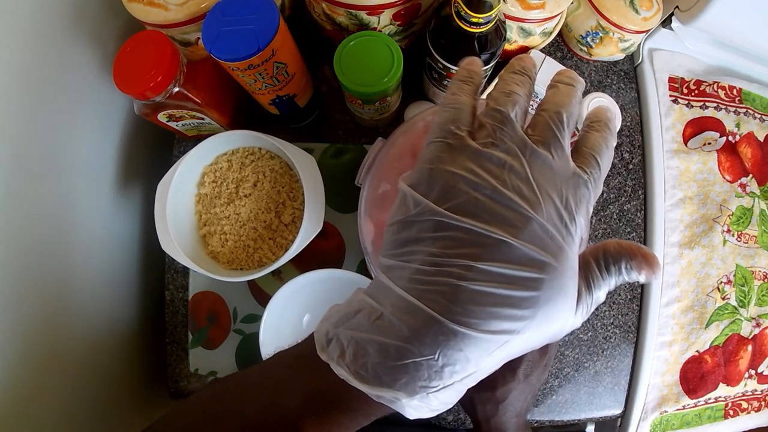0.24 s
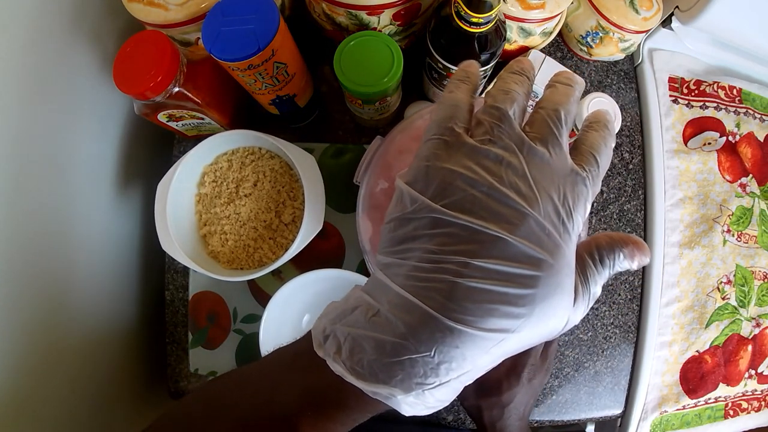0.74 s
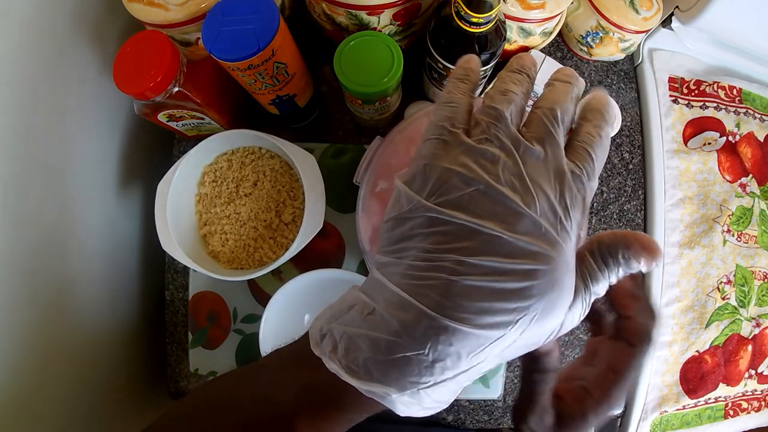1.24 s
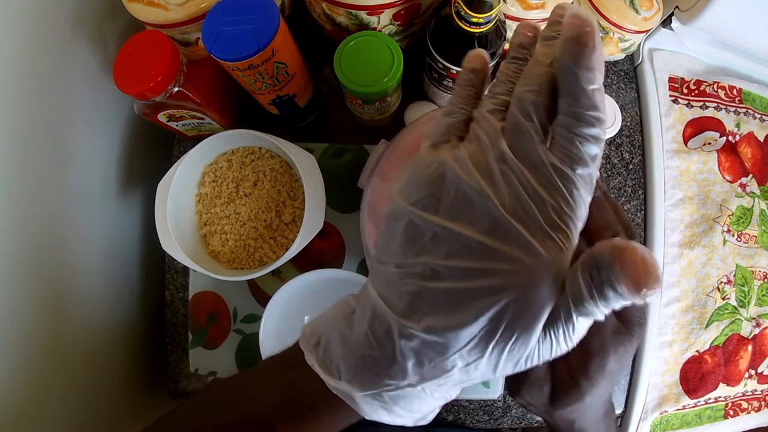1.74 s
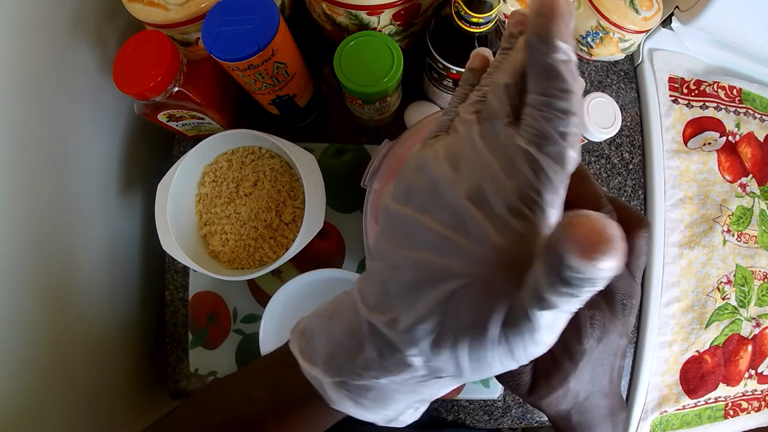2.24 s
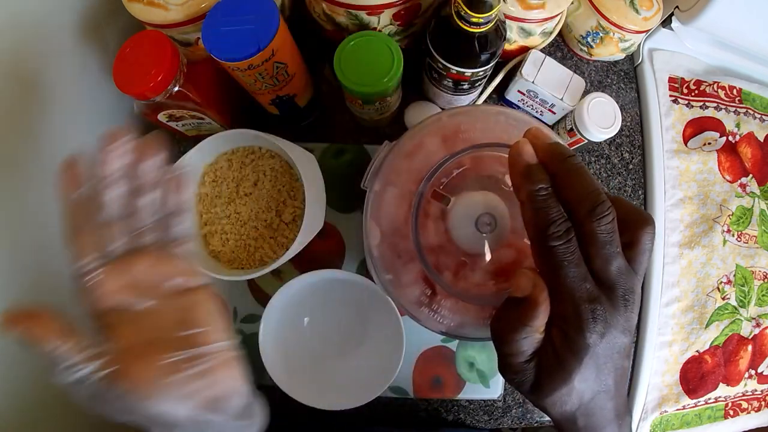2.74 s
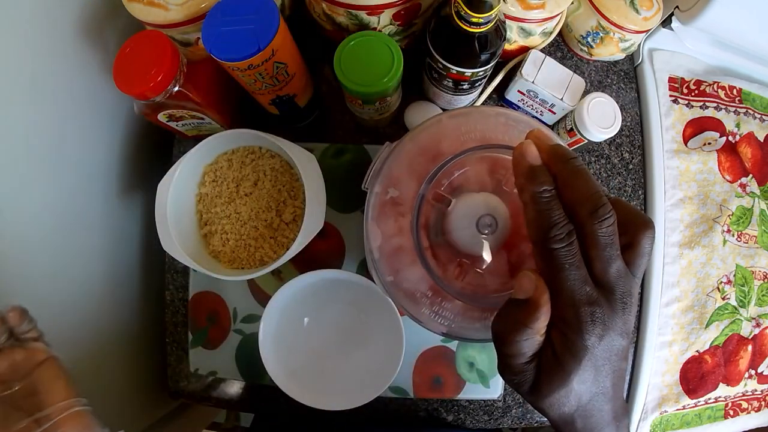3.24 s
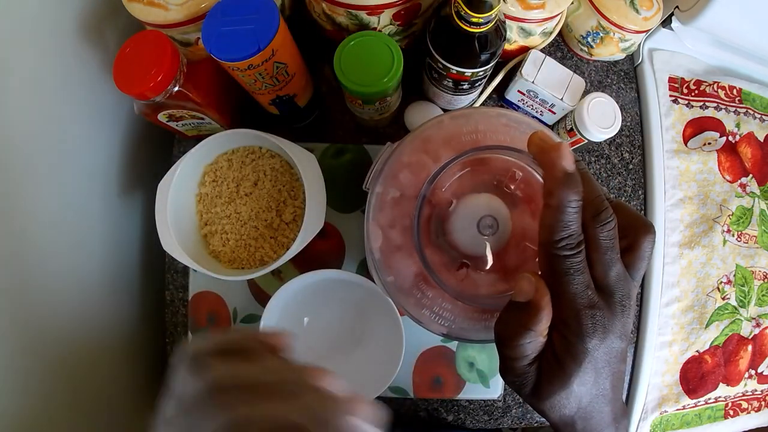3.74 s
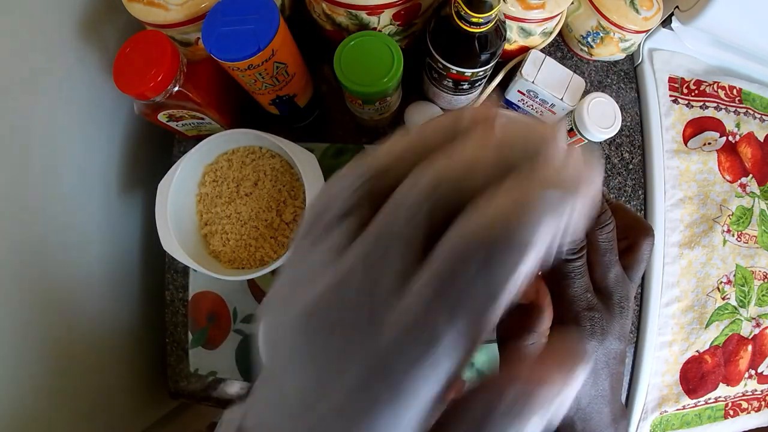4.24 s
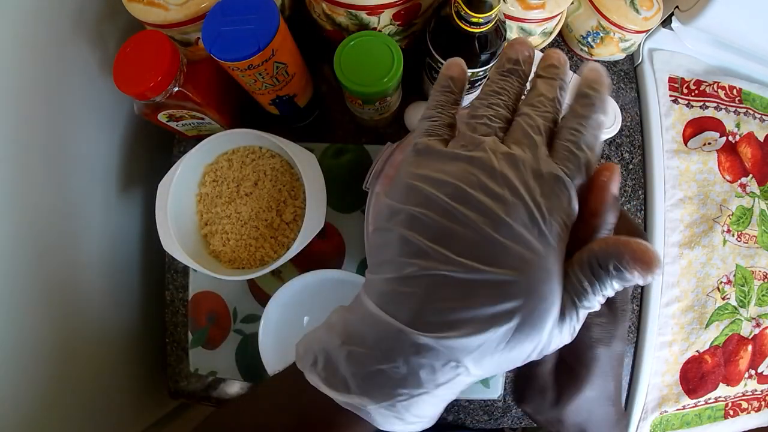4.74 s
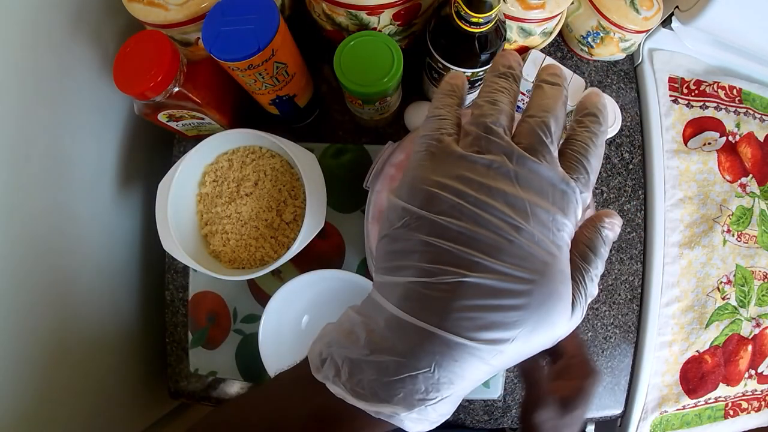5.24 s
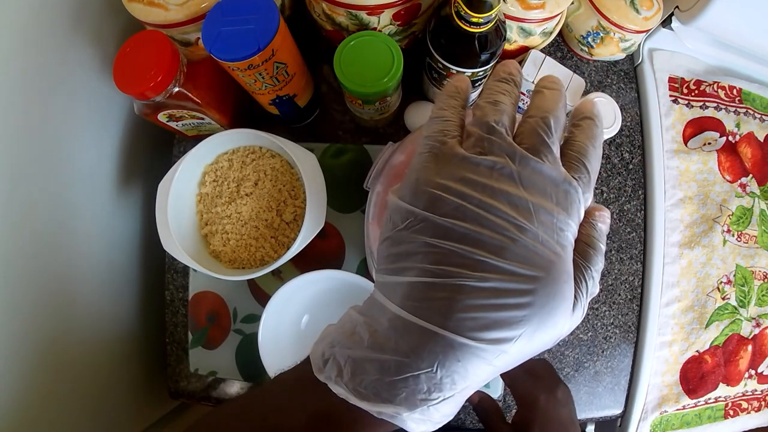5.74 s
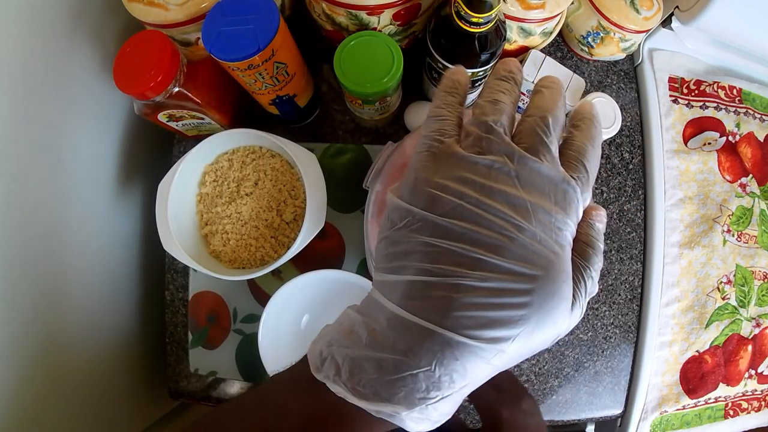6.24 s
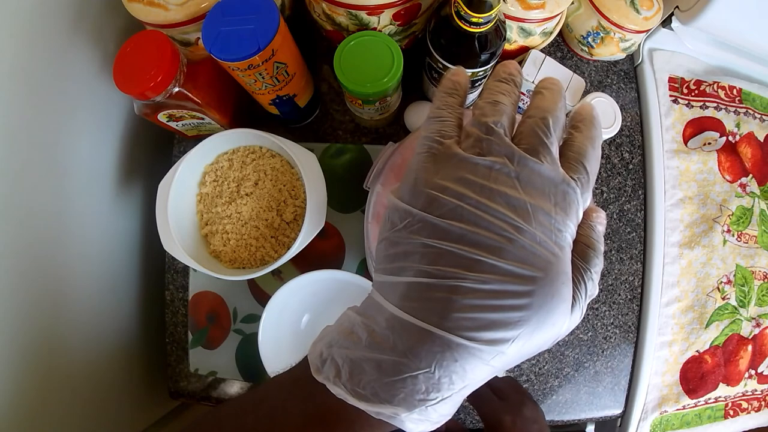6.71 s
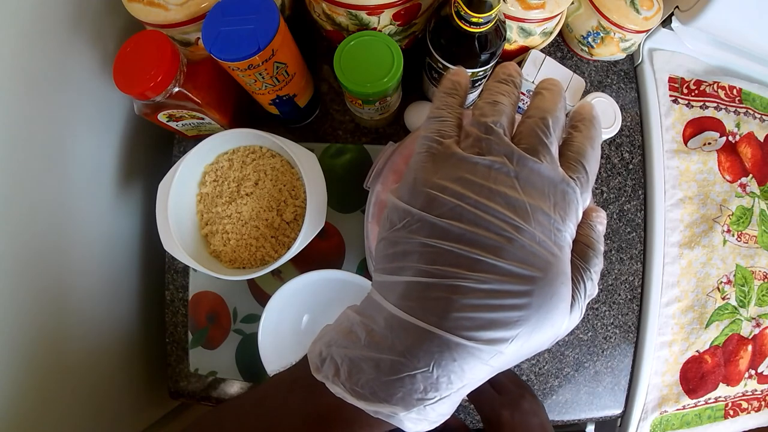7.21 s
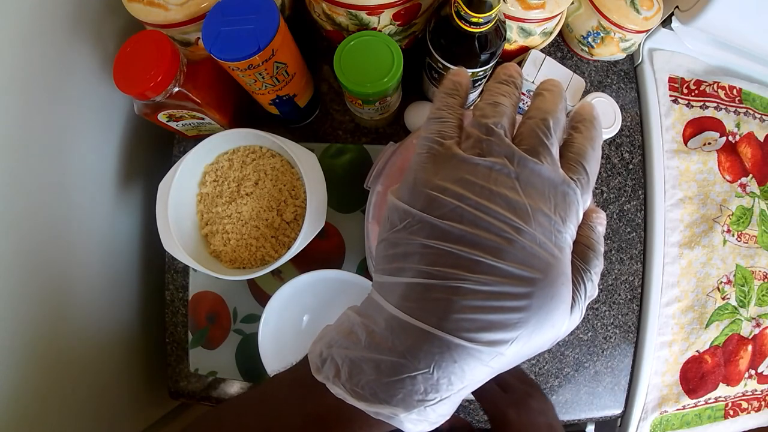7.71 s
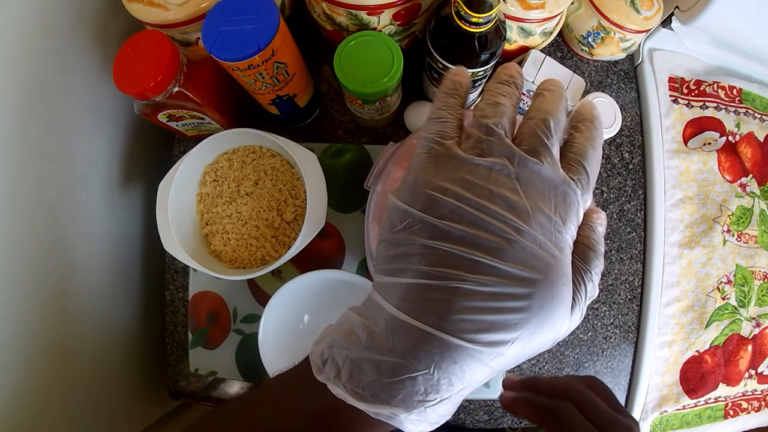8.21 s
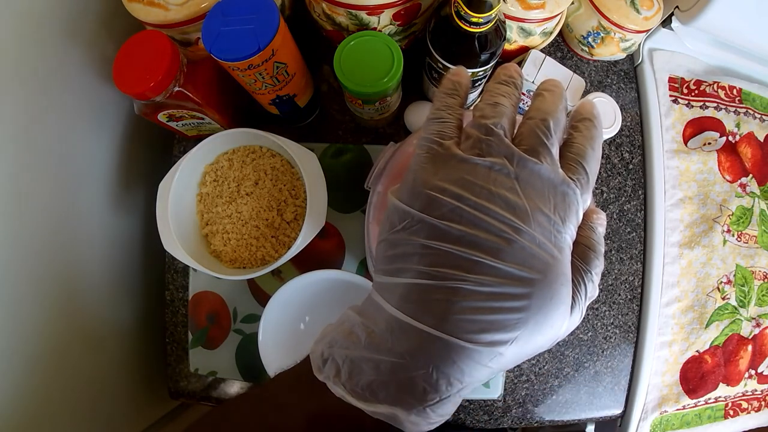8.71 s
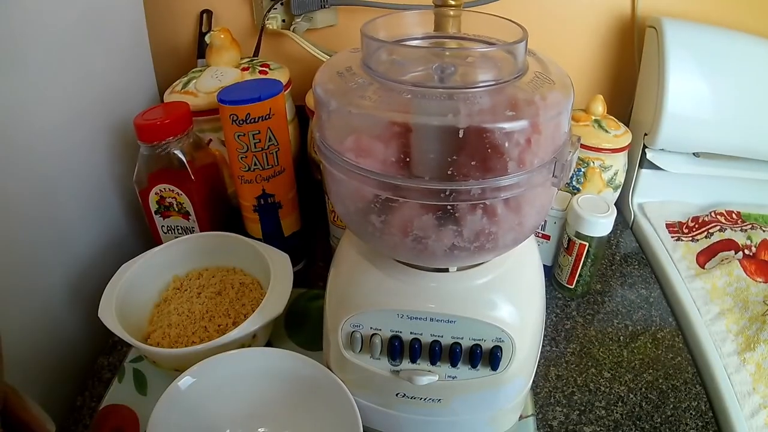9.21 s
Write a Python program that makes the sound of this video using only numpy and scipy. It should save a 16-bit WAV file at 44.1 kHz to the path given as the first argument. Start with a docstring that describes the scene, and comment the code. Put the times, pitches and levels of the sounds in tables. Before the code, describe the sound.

Close, harsh grinding of a blender mincing raw fish, with gear whine and soft thuds, laboring lower before stopping suddenly.

```python
"""A kitchen blender with a chopping bowl grinds raw fish, close by, a gloved hand on the lid. Gear and blade
contacts ring the plastic housing; air pockets plop and mince swishes against the bowl. The geared drive whines,
rasps and squeals over a low rumble, its speed sagging and recovering with load. The hand lifts for two seconds;
later the motor labours at a lower speed. The sound breaks off and quiet room noise follows."""
import sys
import numpy as np
from scipy import signal
from scipy.fft import rfft, irfft
from scipy.io import wavfile

SR = 44100
rng = np.random.default_rng(int(sys.argv[2]) if len(sys.argv) > 2 else 0)


def persist_wave(psi):
    """Save psi, clipped to +-1, as 16-bit WAV."""
    counts = np.round(np.clip(psi, -1, 1) * 32767).astype(np.int16)
    wavfile.write(sys.argv[1], SR, np.atleast_2d(counts).T)


N = 417186
TIME_S = np.arange(N) / SR
STOP_S, ROOM_FROM_S, ROOM_FADE_S = 8.823, 8.968, 0.04
ROOM_DB = -51
FREE_SHAFT_HZ, LABOUR_SHAFT_HZ = 105.3, 98.7
BLADE_RATIO, MESH_RATIO = 0.26, 15.57  # blade turns, tooth contacts per shaft turn

# shaft speed, sagging as the blades bite: time_s, speed_hz
SHAFT_SPEED = [(0.0, 108.6), (0.08, 109.0), (0.24, 105.2), (0.3, 101.9), (0.38, 102.3), (0.58, 107.8),
               (0.74, 104.7), (1.02, 102.9), (1.1, 104.8), (1.16, 103.6), (1.28, 104.9), (1.44, 102.0),
               (1.58, 106.9), (1.8, 108.2), (2.3, 101.4), (2.6, 105.7), (2.84, 101.7), (3.04, 105.1),
               (3.16, 109.2), (3.26, 108.6), (3.38, 104.8), (3.56, 104.5), (3.76, 107.5), (4.06, 105.1),
               (4.38, 108.4), (4.82, 102.7), (4.9, 104.5), (5.14, 105.1), (5.38, 98.6), (5.6, 97.0),
               (5.68, 99.1), (5.94, 96.1), (6.06, 99.8), (6.18, 96.9), (6.6, 99.5), (6.8, 98.4),
               (6.92, 95.2), (7.02, 98.4), (7.3, 100.0), (7.44, 98.3), (7.7, 97.9), (7.76, 100.0),
               (8.16, 100.6), (8.24, 98.2), (8.54, 100.9), (8.8, 99.1)]
# how far the lid is uncovered: time_s, share
LID_UNCOVERED = [(0, 0.24), (1.35, 0.37), (1.6, 0.17), (2.3, 0.38), (2.5, 0.9), (4.4, 1), (4.8, 0.63),
                 (5.3, 0.2)]
# how far the motor labours: time_s, share
MOTOR_LABOUR = [(5.1, 0.09), (5.4, 0.96)]
# gain laws: level_db, uncovered_change_db, labour_change_db, surge_db_per_hz
ROCKING_LAW = (-51.5, 13, 3, -0.5)
IMBALANCE_LAW = (-38.5, -1.5, -6.5, 1.1)
WHISTLE_LAW = (-61, 14, -20.5, 1.1)
CLATTER_LAW = (-21.5, 0.0, -0.84, 0.16)

# room noise spectrum: freq_hz, relative_db
ROOM_SPECTRUM = [(18, -41.5), (30, -10.5), (76, -15.5), (108, -3), (152, -1), (182, -9), (300, -6.5),
                 (404, -14), (443, -8.5), (532, -10), (1780, -35), (7000, -57.5), (9100, -63.5),
                 (15400, -66.5)]
# room hum: pitch_hz, level_db
ROOM_TONES = [(118.4, -58), (151.5, -57), (301.5, -64.5), (443, -61.5)]
# echoes off nearby hard surfaces: delay_s, relative_db
REFLECTIONS = [(0.00779, -13), (0.0131, -14), (0.0197, -15)]
# motor mains hum: pitch_hz, level_db
MAINS_HUM = [(60, -50), (120, -49)]
# bowl drones as the hands shift: centre_s, length_s, level_db, shaft_ratio
BOWL_DRONES = [(1.32, 0.36, -36, 1.85), (3.06, 0.14, -37, 2), (4.6, 0.26, -37, 2), (4.91, 0.16, -37.5, 1.9)]

# drive squeals: centre_s, length_s, pitch_hz, level_db
SQUEALS = [(2.43, 0.03, 3350, -45), (2.614, 0.049, 3350, -39.5), (2.765, 0.018, 3380, -42),
           (3.088, 0.018, 3370, -35), (3.128, 0.04, 3410, -37.5)]
# tooth-rubbed resonances: centre_hz, width_hz, level_db, uncovered_change_db, labour_change_db
RASP_MODES = [(286.3, 70, -49, 7.5, -3.5), (1319, 70, -52, 0, 10.5), (1669, 51, -42.5, 1.5, -7),
              (1905, 170, -52, 7.5, -6), (2938, 290, -57, -2, 10), (3333, 160, -53.5, 5.5, -14),
              (3550, 220, -64, 15, -9), (6130, 250, -67, 4.5, 11.5)]
# treble rasp of the gear mesh: time_s, level_db
MESH_RASP_LEVEL = [(0, -47.5), (0.8, -48.5), (1.5, -47.5), (1.9, -54), (2.8, -51), (3.35, -49.5),
                   (4.2, -47.5), (4.5, -50), (5.05, -47.5), (5.5, -52), (6.2, -49.5), (8.8, -51)]
# clear tone of the gear mesh: time_s, level_db
MESH_WHINE_LEVEL = [(0, -55), (0.35, -38), (0.7, -48.5), (1.3, -44.5), (1.6, -39), (2.2, -48.5),
                    (2.5, -35.5), (2.9, -38), (3.2, -33.5), (3.4, -47), (3.75, -31.5), (4.05, -41.5),
                    (4.25, -35), (4.5, -39), (4.75, -45), (5.2, -46), (5.35, -33), (5.95, -32.5),
                    (6.35, -34), (7.5, -33.5), (8.0, -38.5), (8.3, -31), (8.8, -38)]
# drive tones: shaft_ratio, level_db, uncovered_change_db, labour_change_db, noise_share
DRIVE_TONES = [(0.261, -56.5, -2, -2, .1), (1.993, -52.5, 5.5, -6.5, 0), (3.01, -46.5, -7.5, -7.5, 0.3),
               (3.75, -42.5, -2.5, 4.5, .2), (3.999, -30.0, -3.5, -1.6, .01), (4.44, -46, -3, 5.5, 0.7),
               (14.82, -46.5, -2.5, 11, 0.35), (31, -57, 6.5, 2, 0.5)]

# mince swept round the wall: centre_s, length_s, level_db
SWISHES = [(1.75, 0.2, -41.5), (2.407, 0.099, -46), (3.19, 0.078, -35.5), (3.798, 0.078, -38),
           (5.125, 0.08, -41), (7.45, 0.075, -38.5)]
# wet splat spectrum: freq_hz, relative_db
SWISH_SPECTRUM = [(300, -34), (1400, -7.5), (2100, 1), (3000, -6.5), (4200, -10.5), (6200, -20.5),
                  (7600, -45)]
# air pockets plopping in the mince: centre_s, peak_db, pitch_hz
AIR_PLOPS = [(0.077, -17, 810), (0.284, -14, 1010), (0.335, -17, 956), (0.995, -13, 900),
             (1.432, -9.5, 1010), (1.644, -13, 870), (2.3065, -13.5, 870), (2.362, -18, 410),
             (2.423, -15, 960), (2.769, -19.5, 1640), (3.219, -16, 990), (3.734, -16, 870),
             (4.603, -15, 950), (5.006, -14, 880), (5.954, -14, 400), (6.348, -20.5, 390),
             (6.657, -17, 390), (7.735, -19, 955), (7.948, -19, 1550), (8.787, -26, 950)]
# low ring of the bowl: time_s, gain_db
BOWL_RING_GAIN = [(0, -0.5), (2.2, -0.1), (2.6, 1.5), (3.15, 0), (3.4, -0.4), (4.3, -1.5), (4.9, -1),
                  (5.4, 0), (6.7, 0), (7.5, 0.3), (8.8, -0.4)]
# broad clatter spectrum: freq_hz, relative_db
CLATTER_SPECTRUM = [(25, -37.5), (85, -19.5), (125, -8.5), (240, -17), (330, -8), (520, -13.5),
                    (1000, -10.5), (1650, -12.5), (2400, -27.5), (3800, -32), (5500, -39.5), (6330, -40),
                    (6600, -48), (7700, -60), (15500, -62.5)]
# housing and bowl resonances: centre_hz, width_hz, lift_db
HOUSING_MODES = [(181, 19, 3.5), (363, 45, 7.5), (435.5, 65, 6.5), (607, 49, 7.5), (778, 31, 3.5),
                 (858.4, 102, 11.5), (843, 50, 3.5), (1010, 90, 5), (1093, 56, 7.5), (1266, 55, 3),
                 (1466, 71, 6.5), (1550, 55, 5), (2150, 140, 3.5), (2724, 60, 8), (3750, 130, 5),
                 (4740, 600, 4), (5800, 90, 4.5)]


def from_db(db):
    """Decibels to gain."""
    return 10 ** (np.asarray(db) / 20)


def unit_rms(x):
    """Scale to rms 1."""
    return x / np.sqrt(np.mean(x ** 2) + 1e-20)


def curve(rows):
    """Interpolate (time_s, value) rows at every sample."""
    return np.interp(TIME_S, *np.transpose(rows))


def swell(centre_s, length_s):
    """Rounded rise and fall, height 1."""
    return np.sqrt(np.clip(1 - (2 * (TIME_S - centre_s) / length_s) ** 2, 0, 1))


def drift(rate_hz):
    """Smooth random motion up to about rate_hz, rms 1."""
    step, run_in = 10, 8000
    lowpass = signal.butter(2, min(rate_hz, SR / step / 4), fs=SR / step, output="sos")
    slow = signal.sosfilt(lowpass, rng.standard_normal(N // step + run_in + 2))[run_in:]
    return np.interp(np.arange(N) / step, np.arange(len(slow)), unit_rms(slow))


def sine(turns):
    """Sine, rms 1."""
    return np.sqrt(2) * np.sin(2 * np.pi * turns)


def narrow_noise(turns, width_hz):
    """Noise band around a carrier, rms 1."""
    return (drift(width_hz / 2) * sine(turns) + drift(width_hz / 2) * sine(turns + 0.25)) / np.sqrt(2)


def blend(tone, noise, noise_share):
    """Equal-power mix."""
    return np.sqrt(1 - noise_share) * tone + np.sqrt(noise_share) * noise


def impacts(rate_per_s, spread_db):
    """Random impulses of uneven size and sign."""
    sizes = from_db(spread_db * np.minimum(rng.exponential(1, N), 4)) * rng.choice([-1, 1], N)
    return sizes * (rng.random(N) < rate_per_s / SR)


def coloured(x, spectrum, modes=(), taps=8192):
    """Minimum-phase filter of a broad spectrum plus resonant peaks; output rms 1."""
    hz = np.maximum(np.fft.rfftfreq(taps, 1 / SR), 1)
    points_hz, points_db = np.transpose(spectrum)
    db = np.interp(np.log(hz), np.log(points_hz), points_db)
    for centre_hz, width_hz, lift_db in modes:
        db += lift_db / (1 + (2 * (hz - centre_hz) / width_hz) ** 2)
    cepstrum = irfft(np.log(from_db(db)))
    impulse = irfft(np.exp(rfft(2 * cepstrum[:taps // 2], taps)))
    return unit_rms(signal.oaconvolve(x, impulse)[:N])


def law_gain(law, uncovered, labour, surge_hz):
    """Gain of a part from lid cover, labour and speed above the usual."""
    db, uncovered_db, labour_db, surge_db_per_hz = law
    return from_db(db + uncovered_db * uncovered + labour_db * labour + surge_db_per_hz * surge_hz)


def hum(tones):
    """Sum of steady sines."""
    return sum(from_db(db) * sine(hz * TIME_S) for hz, db in tones)


def room_noise():
    """Dull kitchen air with a faint hum."""
    return from_db(ROOM_DB) * coloured(rng.standard_normal(N), ROOM_SPECTRUM) + hum(ROOM_TONES)


def reflected(x, above_hz=1700):
    """Early reflections comb the treble without raising its level."""
    treble = signal.sosfilt(signal.butter(1, above_hz, "high", fs=SR, output="sos"), x)
    echoes = sum(from_db(db) * np.interp(TIME_S - delay_s, TIME_S, treble, left=0)
                 for delay_s, db in REFLECTIONS)
    power = 1 + sum(from_db(db) ** 2 for _, db in REFLECTIONS)
    return x - treble + (treble + echoes) / np.sqrt(power)


def rocking(centre_hz=59, width_hz=14):
    """The unbalanced load rocks the machine on its feet."""
    return narrow_noise(centre_hz * TIME_S, width_hz)


def imbalance(turns, waver_db=1.5):
    """The unbalanced shaft hums at one cycle per turn."""
    return from_db(waver_db * drift(6)) * sine(turns)


def bowl_drones(turns, noise_share=0.39):
    """Pressed askew, the bowl drones near twice shaft speed."""
    shudder = narrow_noise(2 * turns, width_hz=24)
    out = np.zeros(N)
    for centre_s, length_s, db, ratio in BOWL_DRONES:
        tone = sine(ratio * turns + rng.random())
        out += from_db(db) * swell(centre_s, length_s) * blend(tone, shudder, noise_share)
    return out


def whistle_and_squeals(whistle_gain, surge_hz, whistle_hz=3350, wander_hz=24, flutter_db=1.5):
    """The drive whistles at a resonance; at times it sticks and squeals with a chatter."""
    wander_turns = np.cumsum(wander_hz * drift(110)) / SR
    whistle_turns = np.cumsum(whistle_hz + 4 * surge_hz) / SR
    out = whistle_gain * from_db(flutter_db * drift(35)) * sine(whistle_turns + wander_turns)
    chatter = 1 + 0.45 * narrow_noise(70 * TIME_S, width_hz=40)
    for centre_s, length_s, hz, db in SQUEALS:
        out += from_db(db) * swell(centre_s, length_s) * chatter * sine(hz * TIME_S + wander_turns)
    return out


def tooth_rasp(uncovered, labour, flutter_db=2.5):
    """Rubbing teeth fitfully excite narrow resonances; the hand damps some."""
    out = np.zeros(N)
    for hz, width_hz, db, uncovered_db, labour_db in RASP_MODES:
        level_db = db + uncovered_db * uncovered + labour_db * labour + flutter_db * drift(21)
        out += from_db(level_db) * narrow_noise(hz * TIME_S, width_hz)
    return out


def mesh_rasp(turns, labour, sideband_ratio=0.78, ring_hz=4920, flutter_db=1.84):
    """The third mesh harmonic and its sidebands ring the housing; the ring fades under labour."""
    ratios = 3 * MESH_RATIO + sideband_ratio * np.arange(-2, 3)
    cluster = unit_rms(sum(narrow_noise(ratio * turns, width_hz=36) for ratio in ratios))
    ring = narrow_noise(ring_hz * TIME_S, width_hz=110)
    gain = from_db(curve(MESH_RASP_LEVEL) + flutter_db * drift(25))
    return gain * blend(cluster, ring, 0.38 * (1 - labour))


def mesh_whine(turns, waver_db=0.9):
    """One clear gear tone, swelling as the teeth press together."""
    return from_db(curve(MESH_WHINE_LEVEL) + waver_db * drift(14)) * sine(MESH_RATIO * turns)


def drive_whine(turns, uncovered, labour, waver_db=1.1):
    """Wavering shaft, coupling and mesh tones, roughened by gear play."""
    out = np.zeros(N)
    for ratio, db, uncovered_db, labour_db, noise_share in DRIVE_TONES:
        level_db = db + uncovered_db * uncovered + labour_db * labour + waver_db * drift(12)
        tone_turns = ratio * turns + rng.random()
        rough = narrow_noise(tone_turns, width_hz=40)
        out += from_db(level_db) * blend(sine(tone_turns), rough, noise_share)
    return out


def swishes(churn_db=-47, swing_db=6.0):
    """Fine wet splats on the wall vary with the churning and swell in a few sweeps."""
    splats = coloured(impacts(rate_per_s=2500, spread_db=2.0), SWISH_SPECTRUM)
    churn = from_db(churn_db + swing_db * np.tanh(drift(9)))
    sweeps = sum(from_db(db) * swell(centre_s, length_s) for centre_s, length_s, db in SWISHES)
    return splats * np.hypot(churn, sweeps)


def air_plops(half_width_s=0.0031, sag_hz_per_s=24000):
    """Each air pocket bursts in a few cycles: a soft plop, falling in pitch."""
    out = np.zeros(N)
    for centre_s, peak_db, hz in AIR_PLOPS:
        near = np.abs(TIME_S - centre_s) < 4 * half_width_s
        offset_s = TIME_S[near] - centre_s
        envelope = from_db(peak_db) * np.exp(-(offset_s / half_width_s) ** 2)
        thud_turns = hz * offset_s - sag_hz_per_s * offset_s ** 2 / 2 + rng.random()
        out[near] += envelope * np.sin(2 * np.pi * thud_turns)
    return out


def bowl_pulsed(x, turns, labour, band_hz=(270, 560)):
    """Each blade turn shoves fish against the wall, pulsing the bowl's low ring, more under labour."""
    ring = signal.sosfilt(signal.butter(1, band_hz, "band", fs=SR, output="sos"), x)
    depth = (0.09 + 0.06 * labour) * (1 + 0.2 * drift(2.5))
    pulse = 1 + depth * sine(BLADE_RATIO * turns)
    return x - ring + ring * from_db(curve(BOWL_RING_GAIN)) * pulse


def clatter(turns, churn_gain=0.89, flutter_db=0.88, throb_depth=0.042, heave_db=0.56):
    """Dense gear and blade contacts and the rush of churned fish ring the housing."""
    contacts = unit_rms(impacts(rate_per_s=4200, spread_db=2.5))
    force = contacts + churn_gain * rng.standard_normal(N)
    flutter = from_db(flutter_db * drift(27))
    bite = 1 + throb_depth * drift(2.7) * sine(2 * BLADE_RATIO * turns)  # two blades, biting unevenly
    heave = from_db(heave_db * drift(9))  # the mass tumbles
    return coloured(force * flutter * bite * heave, CLATTER_SPECTRUM, HOUSING_MODES)


def scene(speed_jitter=0.002, stop_fade_s=0.0013, silence_db=-100):
    """Blender running, a short silence, then the still room."""
    speed_hz, uncovered, labour = curve(SHAFT_SPEED), curve(LID_UNCOVERED), curve(MOTOR_LABOUR)
    turns = np.cumsum(speed_hz * (1 + speed_jitter * drift(25))) / SR
    surge_hz = speed_hz - (FREE_SHAFT_HZ * (1 - labour) + LABOUR_SHAFT_HZ * labour)
    state = uncovered, labour, surge_hz

    grinding = reflected(law_gain(CLATTER_LAW, *state) * clatter(turns) + swishes()) + air_plops()
    drive = drive_whine(turns, uncovered, labour) + mesh_whine(turns)
    drive += whistle_and_squeals(law_gain(WHISTLE_LAW, *state), surge_hz)
    drive += reflected(tooth_rasp(uncovered, labour) + mesh_rasp(turns, labour))
    rumble = law_gain(IMBALANCE_LAW, *state) * imbalance(turns)
    rumble += law_gain(ROCKING_LAW, *state) * rocking() + hum(MAINS_HUM) + bowl_drones(turns)
    blender = bowl_pulsed(grinding + drive, turns, labour) + rumble

    running = np.clip((STOP_S - TIME_S) / stop_fade_s + 1, 0, 1)
    room_fade = np.clip((TIME_S - ROOM_FROM_S) / ROOM_FADE_S, 0, 1) ** 2
    room = room_noise() * (room_fade + from_db(silence_db - ROOM_DB))
    return (blender * running + room)[None]


def record(dry, cutoff_hz=15700):
    """Steep low-pass."""
    return signal.sosfilt(signal.ellip(10, 0.1, 80, cutoff_hz, fs=SR, output="sos"), dry)


dry = scene()
out = record(dry)
persist_wave(out)
```